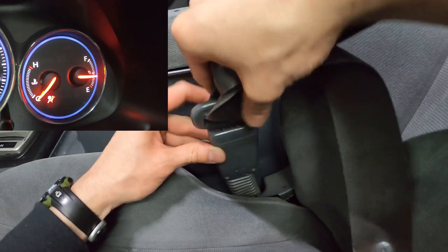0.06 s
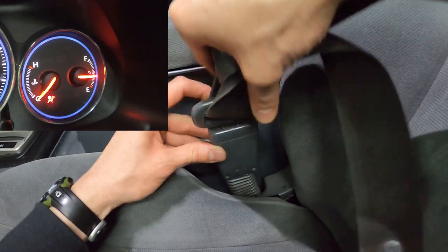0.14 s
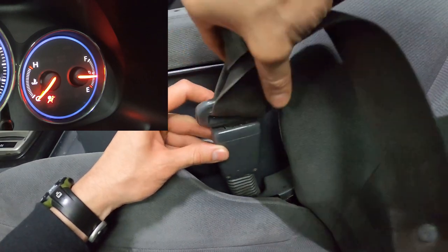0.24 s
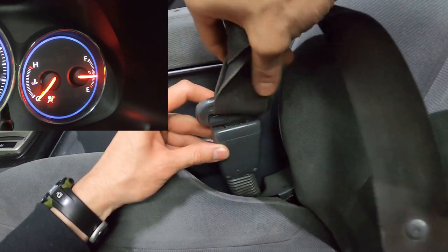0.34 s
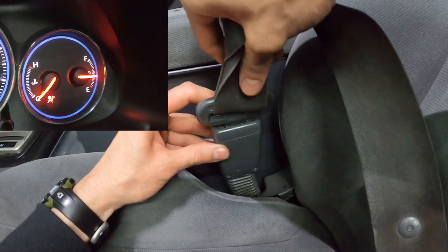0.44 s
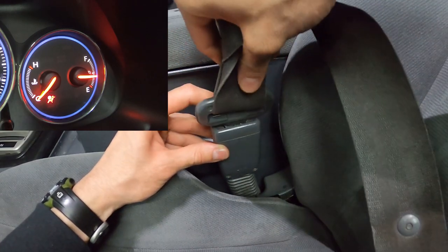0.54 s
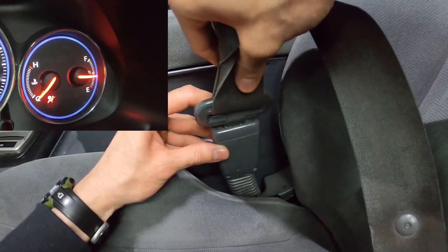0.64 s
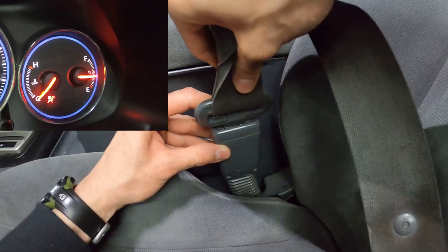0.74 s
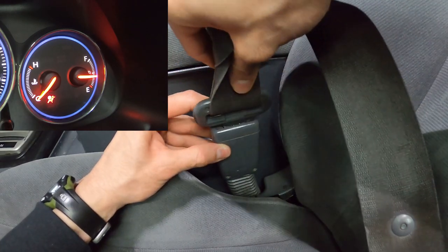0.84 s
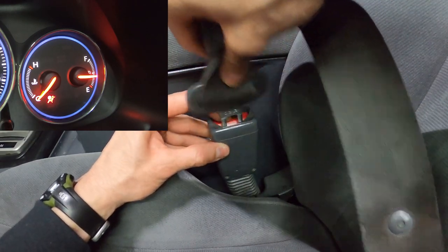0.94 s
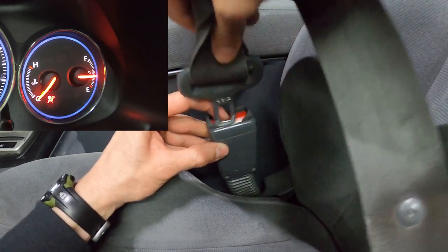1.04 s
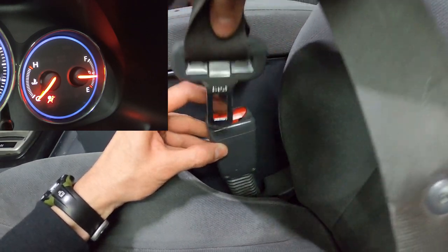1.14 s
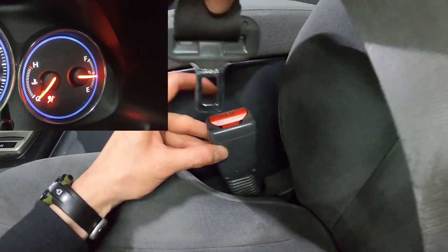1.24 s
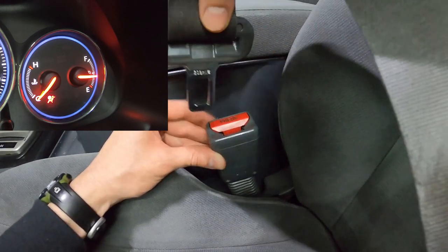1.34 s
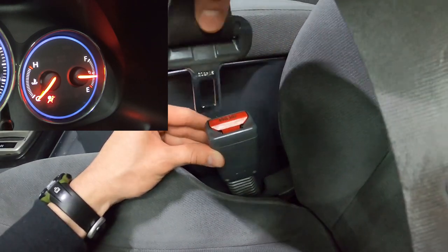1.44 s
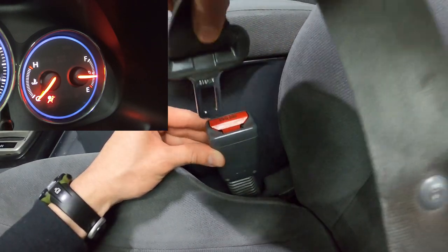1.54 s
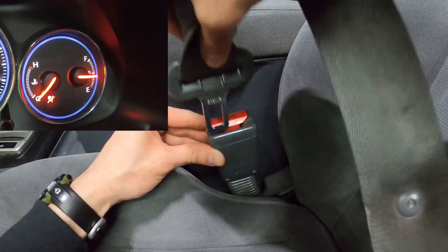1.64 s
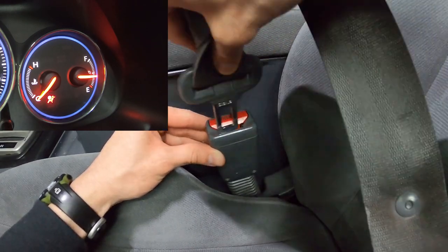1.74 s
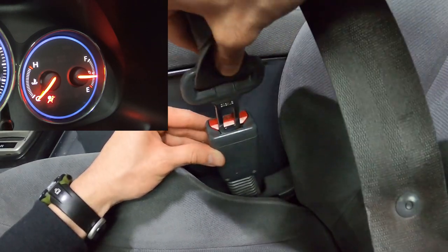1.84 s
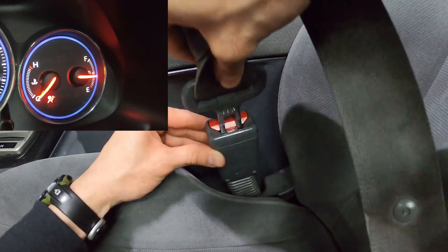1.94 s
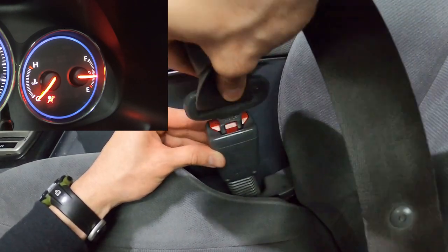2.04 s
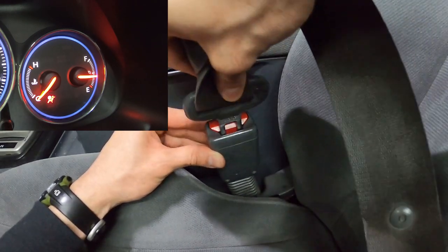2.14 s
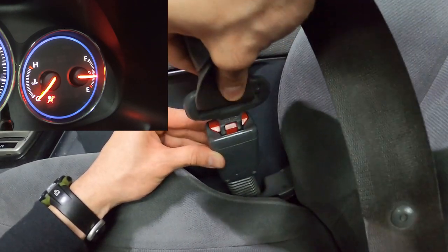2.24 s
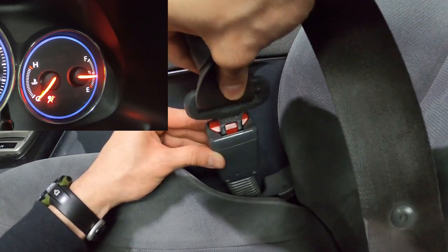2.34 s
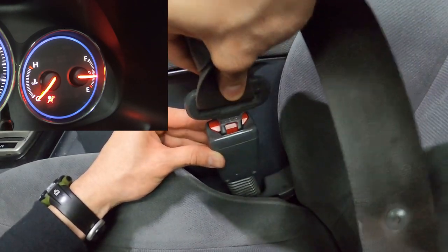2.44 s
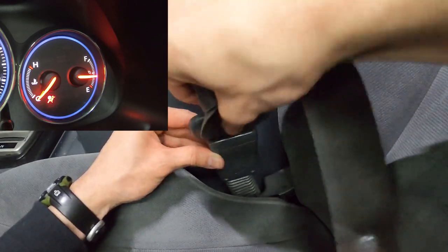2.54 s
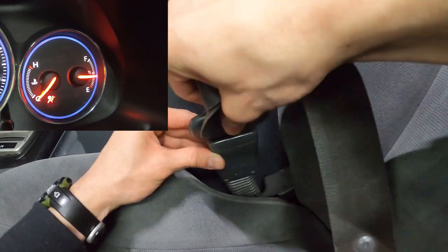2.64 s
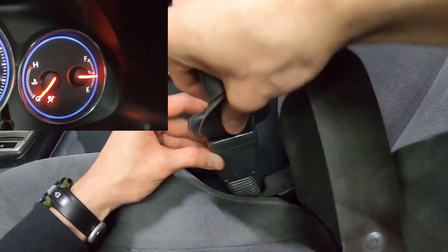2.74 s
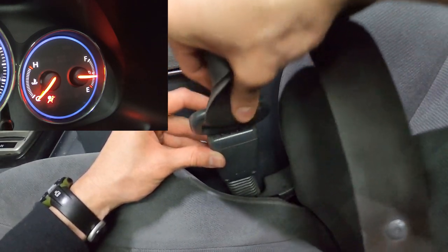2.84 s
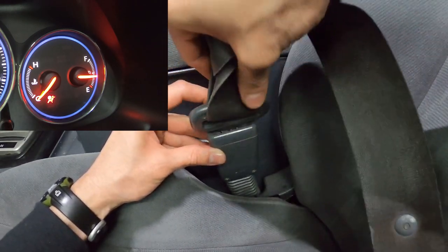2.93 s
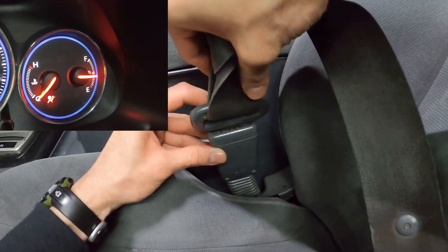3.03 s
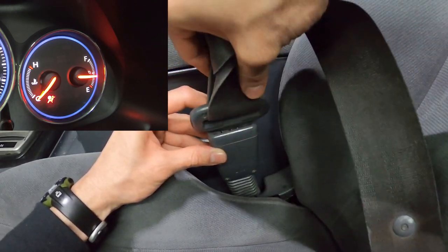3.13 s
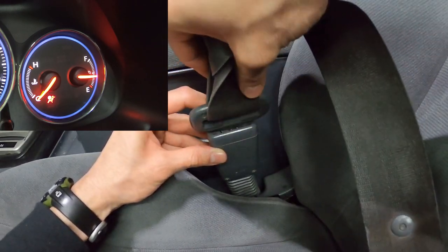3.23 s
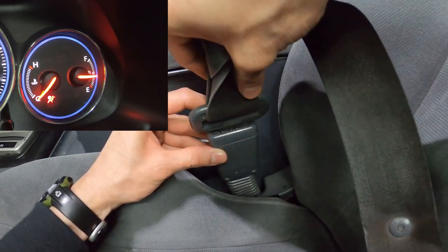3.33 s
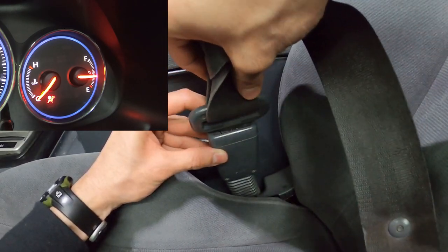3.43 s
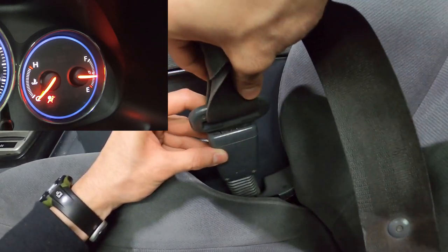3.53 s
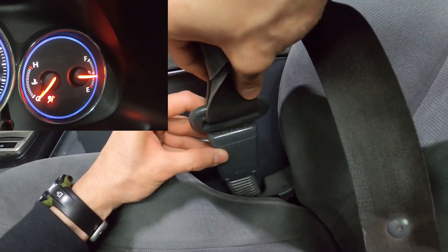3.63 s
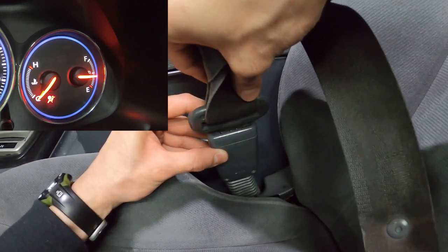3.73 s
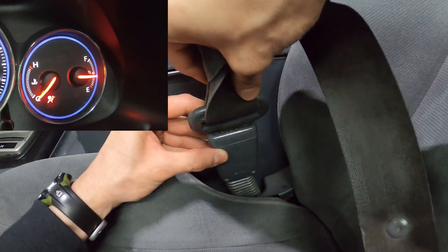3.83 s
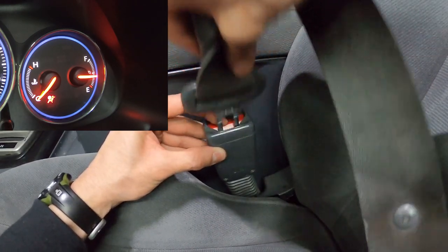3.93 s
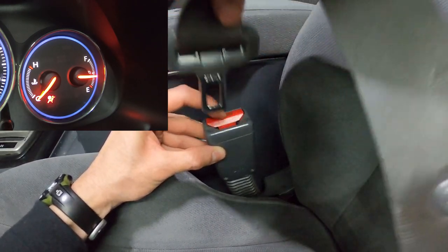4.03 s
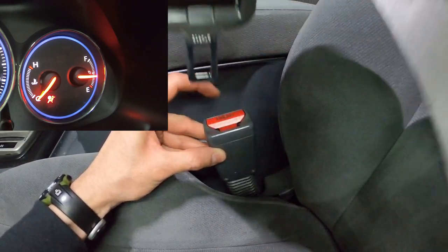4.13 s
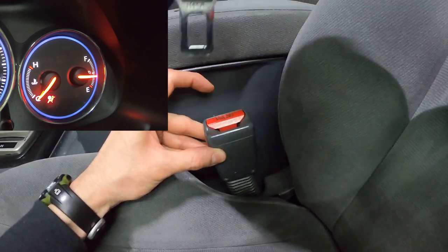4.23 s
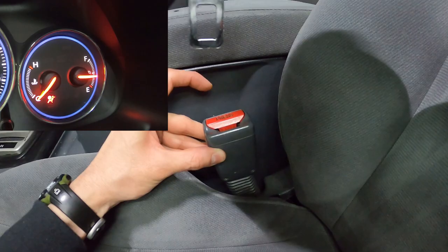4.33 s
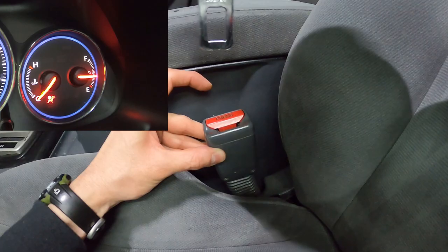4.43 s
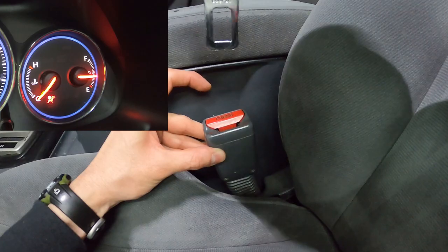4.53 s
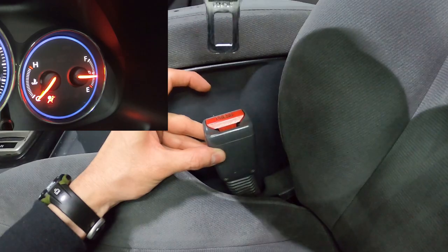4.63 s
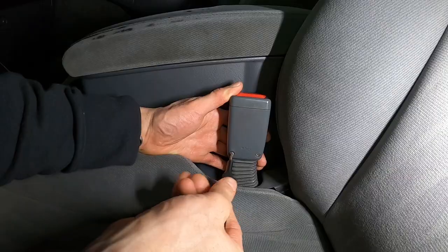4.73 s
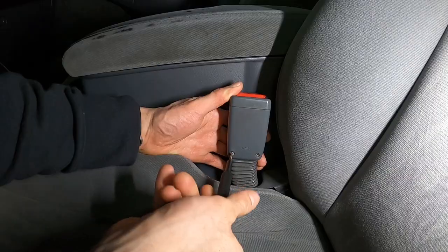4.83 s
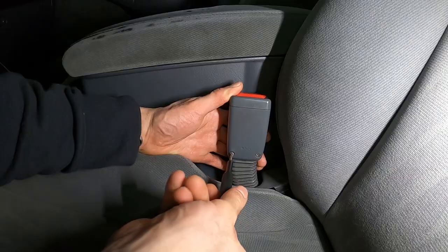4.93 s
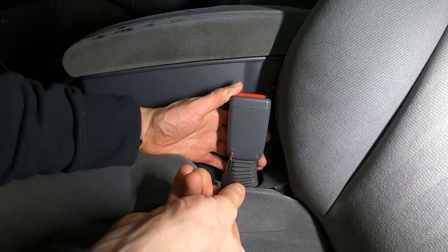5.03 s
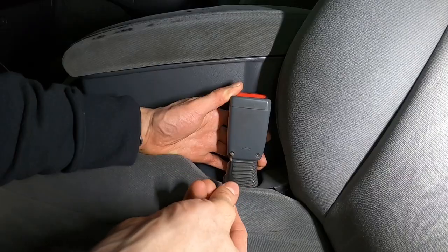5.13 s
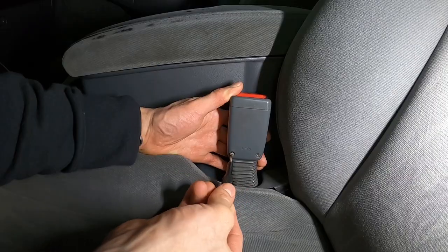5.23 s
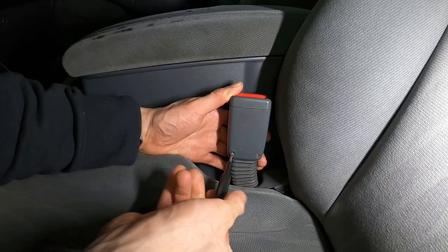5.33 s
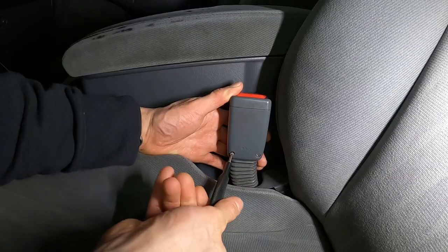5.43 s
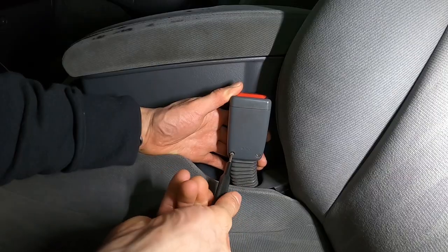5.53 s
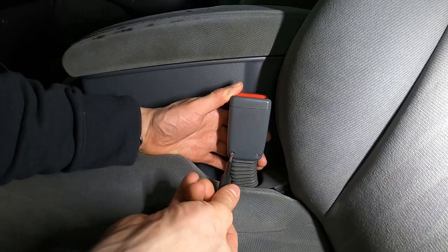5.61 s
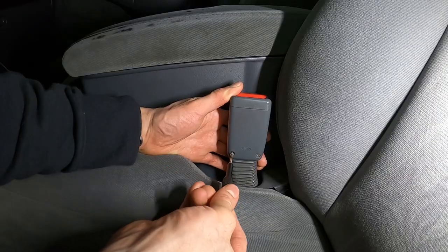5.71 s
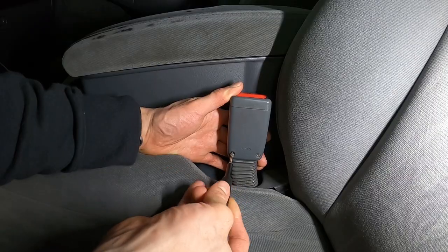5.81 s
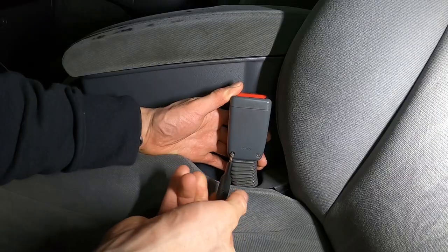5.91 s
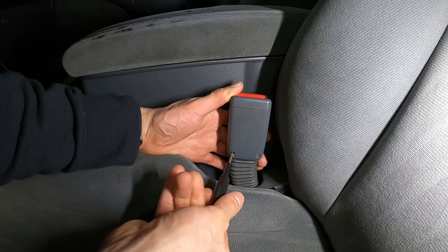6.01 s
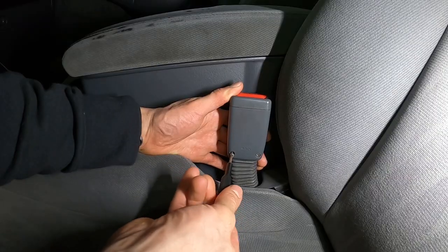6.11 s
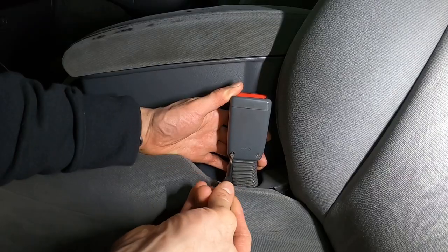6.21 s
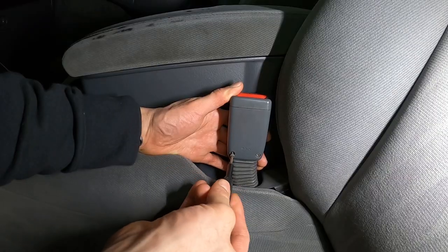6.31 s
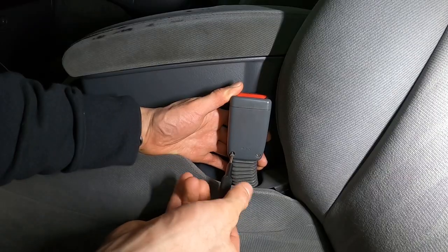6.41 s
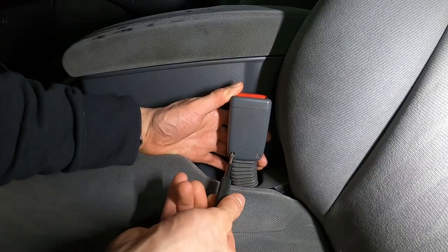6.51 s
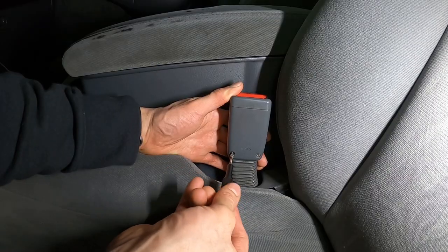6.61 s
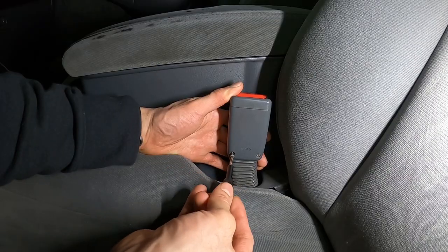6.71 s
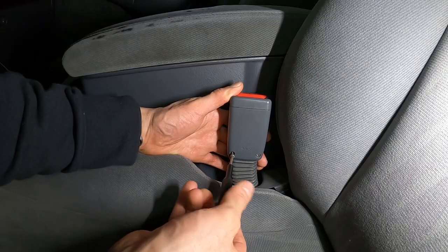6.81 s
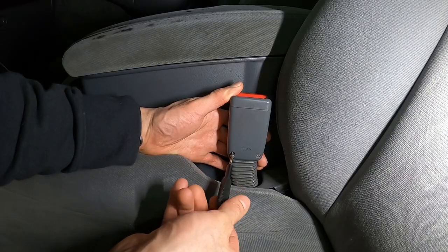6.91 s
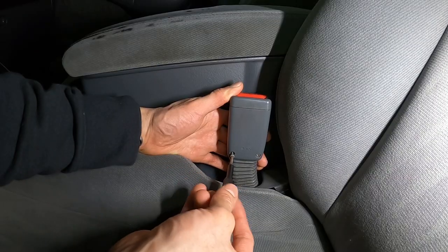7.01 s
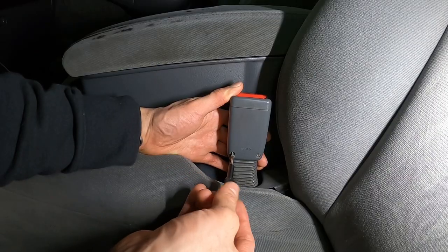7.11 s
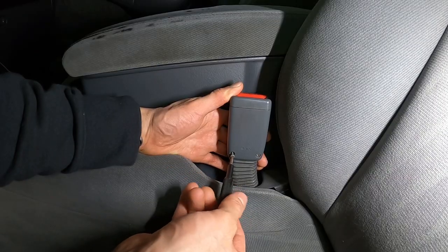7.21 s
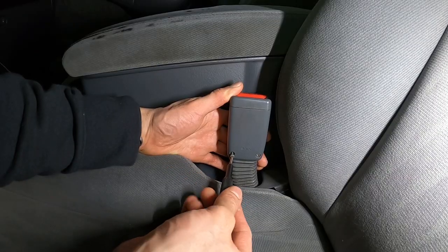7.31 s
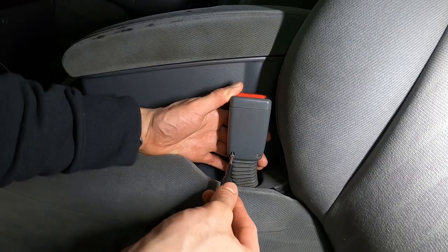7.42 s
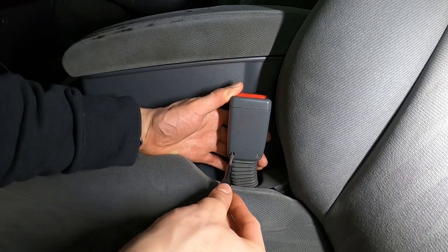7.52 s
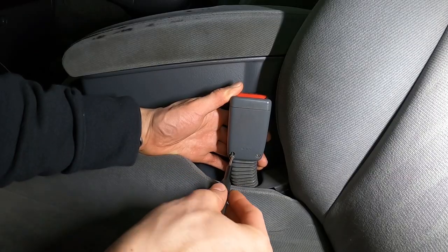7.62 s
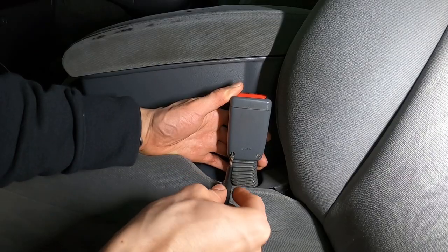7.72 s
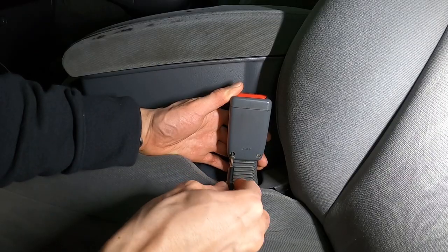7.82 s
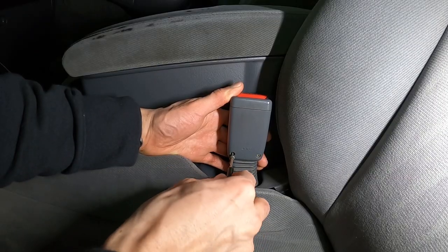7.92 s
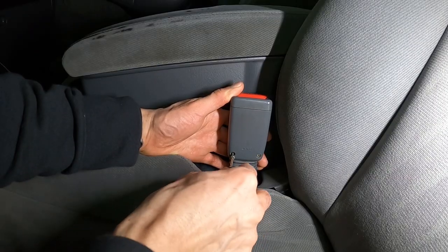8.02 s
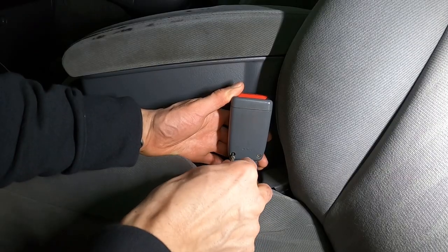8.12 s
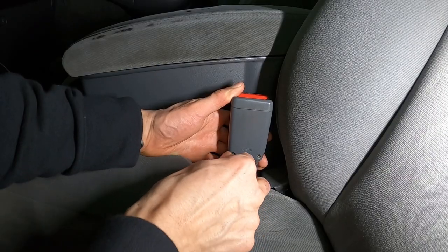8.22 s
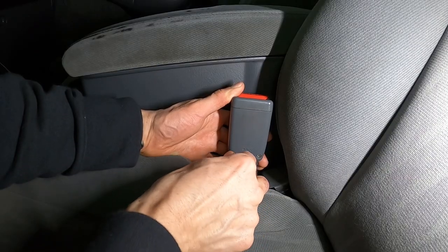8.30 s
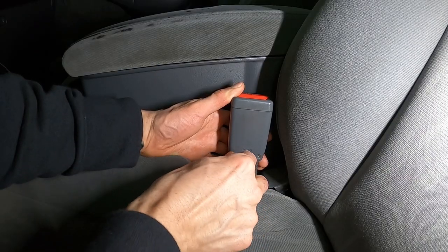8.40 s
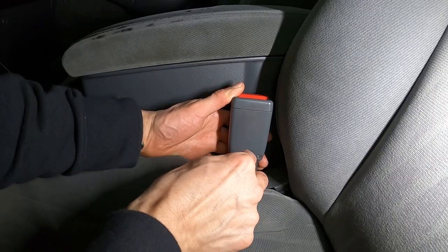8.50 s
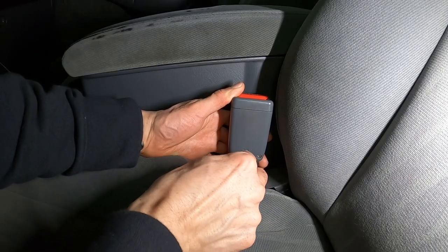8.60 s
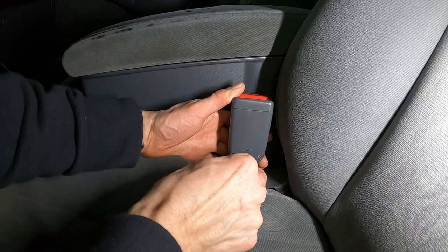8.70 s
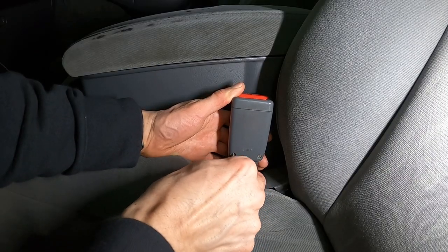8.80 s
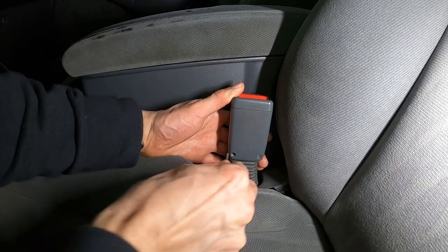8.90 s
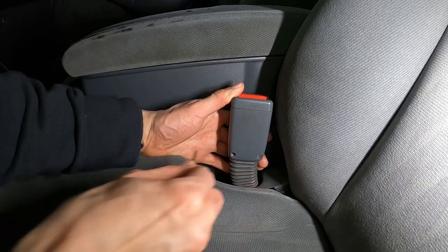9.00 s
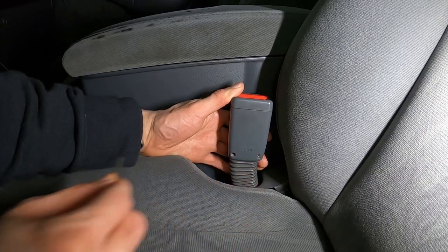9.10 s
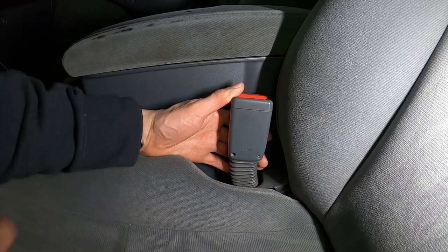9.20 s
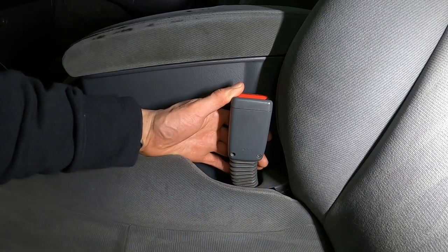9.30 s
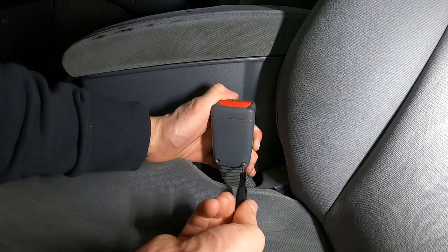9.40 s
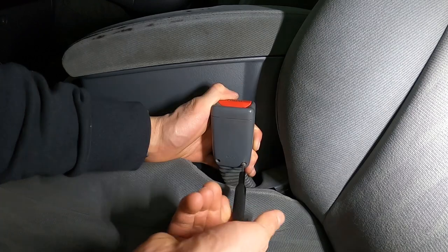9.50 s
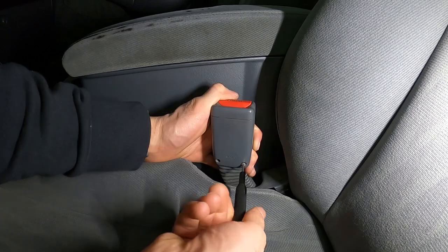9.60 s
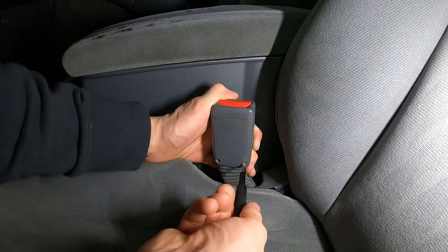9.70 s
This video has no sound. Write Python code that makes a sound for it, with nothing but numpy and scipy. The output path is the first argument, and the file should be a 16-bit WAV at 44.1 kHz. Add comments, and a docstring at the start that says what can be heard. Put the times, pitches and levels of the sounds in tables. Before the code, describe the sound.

Close, sharp seat belt buckle clicks with webbing rustle and low seat thumps, then sparse faint picking ticks, one loud plastic snap, and near silence.

```python
"""Seat belt buckle in a parked car

A latch plate is pushed into its buckle and let go, then a thin tool picks at the buckle.
Short noise rattles click in the plastic shell; the steel plate and a spring ring on as decaying modes.
Webbing and hands rub as dense random slips, and soft pushes make the low modes of the seat thump.
Two close microphone ports hear it with a short cabin tail, over shaped noise for the quiet cabin.
"""
import sys
import numpy as np
from scipy import signal
from scipy.fft import rfft, irfft
from scipy.io import wavfile
from scipy.ndimage import uniform_filter1d

SR = 44100
rng = np.random.default_rng(int(sys.argv[2]) if len(sys.argv) > 2 else 0)


def master(y):
    """Save y as 16-bit WAV."""
    cut = np.clip(np.atleast_2d(y).T, -1, 1)
    pcm = np.round(cut * 32767)  # scale
    wavfile.write(sys.argv[1], SR, pcm.astype(np.int16))


N = 429975

# resonances of the plastic buckle shell: mode_hz, width_hz, relative_level_db
SHELL_MODES = [(1000, 400, -7), (1380, 350, -15.5), (1540, 250, -0.5), (1894, 560, -3), (2140, 550, -2.5),
               (2980, 1300, 10.5), (3500, 76, -8), (4250, 700, 6), (4500, 150, -2), (5440, 1200, -6),
               (5900, 580, -4)]


def undb(db):
    """Gain of a dB value."""
    return 10 ** (np.asarray(db) / 20)


def level(x, db):
    """Set the rms level."""
    return x * undb(db) / np.sqrt(np.mean(x ** 2))


def peak(x, db):
    """Set the peak level."""
    return x * undb(db) / abs(x).max()


def curve(table):
    """Columns of a (time_s, value, ..) table, drawn as straight lines with one value a sample."""
    s, *columns = np.transpose(table)
    return [np.interp(np.arange(N) / SR, s, column) for column in columns]


def along(table):
    """A (pitch_hz, value) table on the bins of a full-length spectrum, joined along log pitch."""
    hz, value = np.transpose(table)
    bins_hz = np.arange(N // 2 + 1) * SR / N
    return np.interp(np.log(bins_hz + 1), np.log(hz + 1), value)


def colour(x, table):
    """Shape a full-length sound by a (pitch_hz, level_db) spectrum."""
    return irfft(rfft(x) * undb(along(table)), N)


def mode(x, hz, t60):
    """A decaying sine resonance whose envelope starts at 1 for a unit blow; t60 in seconds."""
    pole = np.exp(2j * np.pi * hz / SR - np.log(1000) / (max(t60, 1e-3) * SR))
    return signal.lfilter([1], [1, -pole], x).imag


def band(x, lo_hz, hi_hz):
    """Gentle band-pass."""
    return signal.sosfilt(signal.butter(2, [lo_hz, hi_hz], "band", fs=SR, output="sos"), x)


def walk(rate):
    """Random levels held 1 / rate seconds and smoothed twice; spread 1."""
    hold = int(SR / rate)
    steps = np.repeat(rng.standard_normal(N // hold + 1), hold)
    smooth = uniform_filter1d(uniform_filter1d(steps, hold), hold)[:N]
    return smooth / smooth.std()


def add(out, x, s):
    """Mix x into out from time s."""
    i = int(s * SR)
    out[i:i + len(x)] += x[:N - i]


def port_pair(shape, own_db):
    """Noise common to both ports plus a part of its own at each, own_db relative to the common one."""
    common = shape(rng.standard_normal(N))
    own = np.array([shape(rng.standard_normal(N)) for _ in range(2)])
    return common + undb(own_db) * own


def cabin():
    """Low rumble and boom follow the sway of seat and bodywork under the hands, over a faint steady hiss."""
    # seat and bodywork moving: time_s, rumble_level_db, boom_level_db
    sway = [(0.0, -49.5, -59.5), (0.57, -70.5, -80.5), (0.97, -53, -62.5), (1.63, -59.5, -74),
            (2.01, -57, -68), (2.58, -58, -73), (2.82, -53.5, -64), (3.26, -63.5, -79),
            (4.04, -53.5, -68.5), (4.24, -58.5, -62.5), (4.56, -69, -75), (5.19, -61.5, -64),
            (5.54, -74, -67), (6.16, -63, -64.5), (6.54, -76.5, -68.5), (7.82, -70.5, -69),
            (8.74, -73, -64), (8.96, -61, -67.5), (9.42, -73, -71.5), (9.75, -76, -68)]
    # boom spectrum: pitch_hz, density_db (per Hz, relative)
    boom_colour = [(41, -43.5), (70, -16), (107, -14.5), (126, -2), (150, 0.5), (214, -3), (265, -11.5),
                   (337, -14), (500, -24), (650, -54.5), (1100, -120)]
    # hiss spectrum: pitch_hz, density_db (per Hz, relative)
    hiss_colour = [(210, -30), (350, -4), (404, -9), (581, -5.5), (906, -4.5), (1260, -2.5), (2310, -19),
                   (4030, -26), (4870, -23), (10100, -38.5), (15500, -35.5)]
    rumble_db, boom_db = curve(sway)

    surge_db = 2.5 * walk(12)
    rumble = level(port_pair(lambda x: band(band(x, 17, 65), 5.3, 59), -13.0), 0)
    rumble = undb(rumble_db + surge_db) * rumble

    flicker_db = 2.6 * walk(19)
    boom = level(port_pair(lambda x: colour(x, boom_colour), -9), 0)
    boom = undb(boom_db + flicker_db) * boom

    hiss_drift_db = 1.0 * walk(12)
    hiss = level(port_pair(lambda x: colour(x, hiss_colour), 2.0), -80)
    return rumble + boom + undb(hiss_drift_db) * hiss


def thumps(push_s=0.0098, apart=.35):
    """A soft, uneven push rings the low modes of seat and stalk; the ports feel it a little differently."""
    # pushes that reach the seat frame: start_s, seat_peak_db, t60_s, stalk_relative_db
    pushes = [(0.047, -39.5, 0.23, -16.5), (0.875, -47, 0.13, 1.5), (1.021, -32, 0.49, -10.5),
              (1.778, -36.5, 0.27, -4), (2.128, -47.5, 0.37, -6), (2.601, -38, 0.21, -13.5),
              (2.628, -33.5, 0.47, -18), (2.67, -43, 0.35, -6.5), (3.757, -42, 0.18, -10),
              (3.987, -30.5, 0.5, -6.5), (7.15, -38, 0.14, 1), (7.94, -59.5, 0.2, 7),
              (8.201, -60, 0.22, 8.5), (8.71, -54, 0.3, -8), (8.757, -46.5, 0.45, -14),
              (8.81, -47, 0.3, -11), (8.867, -44, 0.48, -16.5), (8.919, -50.5, 0.18, -5),
              (9.563, -52, 0.41, -0.5)]
    # seat modes: mode_hz, level_db, decay_share (of the push's t60)
    seat_modes = [(45.7, -2, 0.96), (58.2, -8, 0.077), (88.8, -10, 0.27)]
    # modes of the buckle's stalk: mode_hz, level_db, t60_s
    stalk_modes = [(120, -5, .09), (175, 0, .08), (250, -1, .07), (340, -3, .05), (480, -12, .04)]
    out = np.zeros((2, N))
    t = np.arange(SR // 2) / SR
    chance = rng.standard_normal((len(pushes), 2, len(t)))
    for (s, db, t60, stalk_db), noise in zip(pushes, chance):
        swell = t / push_s * np.exp(-t / push_s)  # fullest after push_s
        push = swell * (noise[0] + apart * noise[1] * np.array([[1], [-1]]))
        seat_push = push.mean(0) + 0.37 * push  # mostly common to both ports
        seat = sum(undb(m_db) * mode(seat_push, f, t60 * share) for f, m_db, share in seat_modes)
        stalk = sum(undb(m_db) * mode(push, f, ring) for f, m_db, ring in stalk_modes)
        both = peak(seat, db) + peak(stalk, db + stalk_db)
        add(out.T, both.T, s)
    return out


def shell(x, hz, spread, chance):
    """Shell modes nearest the pitch ring loudest, those near an octave up answer; spread in octaves."""
    out = 0
    for (f, width, m_db), c in zip(SHELL_MODES, chance):
        octaves = np.log2(f / hz)
        near = np.exp(-(octaves / spread) ** 2)
        answer = .2 * np.exp(-((octaves - .8) / spread) ** 2)
        ring = mode(x, f, 2.2 / width) * np.sqrt(width)  # a wide resonance dies sooner
        out = out + (near + answer) * undb(m_db + 2 * c) * ring
    floor_hz = min(hz, 2500)
    return level(band(band(out, .6 * floor_hz, 6500), .55 * floor_hz, 7000), 0)


def bright(x, apart=0.58):
    """Treble of a contact: rows of x are a shared noise and one that differs between the ports."""
    both = x[0] + apart * x[1] * np.array([[1], [-1]])
    return band(band(both, 5500, 10300), 4500, 12000)


def slips(grains_per_s=7000, scatter_db=2.0):
    """Friction as dense tiny slips of uneven size at random moments, coming in patches."""
    happens = rng.random((2, N)) < grains_per_s / SR
    size = rng.standard_normal((2, N))
    extra_db = scatter_db * np.minimum(rng.exponential(size=N), 3)
    patches_db = 1.4 * walk(77)
    return happens * size * undb(extra_db) * undb(patches_db)


def rubbing():
    """Webbing and skin slide slowly; each quick slide swells, rings the shell and dies."""
    # slow sliding: time_s, level_db
    slow_slide = [(0.0, -69), (0.16, -62), (0.46, -90), (0.51, -85.5), (0.97, -88), (1.08, -66),
                  (1.25, -73), (1.57, -78.5), (1.87, -80.5), (2.55, -92), (2.71, -71), (2.95, -70.5),
                  (3.09, -104), (4.0, -94), (4.13, -68), (4.37, -84.5), (4.45, -108), (4.75, -93),
                  (4.86, -84.5), (7.6, -87), (8.2, -80.5), (8.5, -87.5), (9.35, -81.5), (9.75, -87)]
    # spectrum of the weave: pitch_hz, density_db (per Hz, relative)
    weave_colour = [(400, -23.5), (1000, -9), (1500, -4), (2800, -3), (4600, -8), (6500, -15), (9000, -28),
                    (15400, -60.5)]
    # quick slides: start_s, length_s, level_db, treble_relative_db, pitch_hz
    scrapes = [(0.035, 0.085, -69, -25, 1760), (0.297, 0.11, -75.5, -13, 2420),
               (0.383, 0.12, -65.5, -16, 2320), (0.692, 0.12, -74.5, -7, 2900),
               (0.849, 0.041, -47.5, -17, 1560), (1.005, 0.072, -44, -4.5, 2110),
               (1.07, 0.022, -63, -13, 3300), (1.17, 0.052, -59, -6, 1760), (1.304, 0.02, -62.5, -12, 2900),
               (1.333, 0.088, -53.5, -13, 2900), (1.408, 0.04, -61.5, -11, 2900),
               (1.498, 0.25, -70.5, -18, 2900), (1.788, 0.067, -63, -32, 1080),
               (2.026, 0.18, -68.5, -14, 1200), (2.302, 0.074, -87.5, 7, 1650),
               (2.524, 0.098, -62, -8, 2900), (2.58, 0.051, -50, -11, 3000), (2.61, 0.019, -62, 0, 3420),
               (2.836, 0.041, -50, -9, 2900), (2.855, 0.025, -53, -24, 2160),
               (2.921, 0.19, -64.5, -15, 2600), (3.698, 0.042, -58.5, -30, 1650),
               (3.729, 0.053, -54, -18.5, 1510), (3.942, 0.083, -64, -12, 3550),
               (3.984, 0.087, -54.5, -8, 2900), (4.09, 0.097, -63, -13, 1100),
               (4.307, 0.094, -84.5, 4.5, 1984), (4.807, 0.1, -74.5, -17.5, 1910),
               (5.204, 0.072, -79, -10, 1660), (5.399, 0.051, -73.5, -30.5, 1850),
               (5.547, 0.083, -73, -25.5, 2600), (5.838, 0.072, -76, -8, 2200),
               (5.934, 0.081, -66.5, -26.5, 2210), (6.26, 0.12, -76, -18, 2190),
               (6.413, 0.026, -76.5, -23, 2100), (6.73, 0.078, -78, -20.5, 2590),
               (6.885, 0.024, -75.5, -28, 1950), (7.032, 0.15, -73, -27.5, 1900),
               (7.153, 0.1, -68.5, -28.5, 2900), (7.33, 0.06, -73, -25, 1850),
               (8.713, 0.07, -74.5, -33, 3300), (8.776, 0.14, -70, -32.5, 1850),
               (8.884, 0.066, -56, -22, 2900), (9.538, 0.037, -53.5, -16, 1590)]
    grains = slips()
    weave = level(colour(grains[0], weave_colour), 0)
    hiss = level(bright(grains), 0)
    out = undb(curve(slow_slide)[0]) * (weave + undb(-15) * hiss)

    chance = rng.standard_normal((len(scrapes), len(SHELL_MODES)))
    for (s, length, db, treble_db, hz), w in zip(scrapes, chance):
        part = slice(int(s * SR), int((s + length) * SR))
        swell = np.hanning(part.stop - part.start) ** 1.6
        body = .8 * weave[part] + .6 * shell(grains[0, part], hz, .3, w)
        out[:, part] += swell * undb(db) * (body + undb(treble_db) * hiss[:, part])
    return out


def ejector_spring():
    """Blows set the spring humming in long modes, each paired with one 22 Hz higher so that it beats."""
    # blows on the spring: start_s, low_mode_db, middle_mode_db, high_mode_db
    spring_blows = [(0.778, -77, -80, -95), (1.251, -72.5, -59, -74), (1.974, -74.5, -84, -94),
                    (2.197, -76, -90, -81), (2.64, -80, -64.5, -80), (3.983, -82, -68, -86)]
    # spring modes: mode_hz, t60_s
    spring_modes = [(940, 1.6), (1949, .8), (3800, .35)]
    out, blow = np.zeros(N), signal.unit_impulse(SR)
    for s, *dbs in spring_blows:
        for db, (f, t60) in zip(dbs, spring_modes):
            beating = mode(blow, f, t60) + 0.74 * mode(blow, f + 22, t60)
            add(out, undb(db) * beating, s)
    return out


def steel_plate():
    """Blows leave the loose plate ringing in short modes whose strengths vary from blow to blow."""
    # blows on the plate: start_s, level_db
    plate_blows = [(.866, -43), (1.047, -38.5), (1.09, -54.5), (1.133, -55.5), (1.175, -44), (1.805, -55.5),
                   (4.013, -36.5)]
    # plate modes: mode_hz, relative_level_db (before the chance of each blow), t60_s
    plate_modes = [(1820, -1, .06), (3300, -12, .06), (4200, -4, .04), (5080, -16, .04), (6290, -1, .045)]
    out, blow = np.zeros(N), signal.unit_impulse(SR)
    chance = rng.standard_normal((len(plate_blows), len(plate_modes)))
    for (s, db), w in zip(plate_blows, chance):
        for (f, m_db, t60), c in zip(plate_modes, w):
            add(out, undb(db + m_db + 1.9 * c) * mode(blow, f, t60), s)
    return out


def contacts():
    """All contacts: the listed ones and faint strays of fingers and tool at random moments."""
    # contacts: start_s, body_peak_db, strongest_pitch_hz, treble_relative_db
    listed = [(0.028, -28, 3780, -3), (0.038, -27, 2500, -20), (0.0429, -53, 1030, -17),
              (0.085, -43, 1470, -12.5), (0.139, -47, 2720, -15), (0.165, -47, 1710, -8),
              (0.2026, -49.5, 1380, -4), (0.429, -54, 2360, -17), (0.478, -54.5, 2500, -15),
              (0.7824, -44, 1450, -61), (0.8127, -53, 1350, -27), (0.826, -43.5, 2370, -21),
              (0.8678, -30.5, 1400, -18), (0.8711, -27.5, 4230, -7), (0.876, -31.5, 1410, -16),
              (0.8949, -48, 1030, -32), (0.9865, -54.5, 990, -36), (1.0104, -48, 3640, -21),
              (1.0213, -20, 1760, -7), (1.0499, -26.5, 4250, -10), (1.0582, -29, 1420, -17),
              (1.121, -47.5, 1530, -29), (1.1468, -51, 1360, -7), (1.1666, -42.5, 1590, 2.5),
              (1.1778, -34.5, 6140, -13), (1.1974, -36, 1350, -22), (1.203, -33.5, 1700, -35),
              (1.226, -42.5, 1490, -29), (1.2529, -20.5, 4000, -17), (1.386, -40, 2900, -9.5),
              (1.5573, -52.5, 2970, -11), (1.6226, -52, 2930, -35), (1.7834, -30, 1350, -11),
              (1.7915, -45, 690, -30), (1.8051, -40.5, 890, -12), (1.8693, -41.5, 1200, -11),
              (1.974, -51.5, 890, -29), (2.0649, -46.5, 1300, -9), (2.1317, -37, 4450, -12.5),
              (2.189, -48, 4500, -8), (2.1966, -40.5, 5380, -8.5), (2.347, -66.5, 4980, -2.5),
              (2.493, -55, 4000, -12), (2.5259, -49.5, 1590, -38), (2.5807, -25, 2180, -8.5),
              (2.6141, -22, 3270, -4), (2.6206, -12.5, 3950, -8), (2.7411, -39, 2800, -21),
              (2.809, -59, 3500, -5), (2.8414, -37.5, 1550, -21), (2.8528, -28, 2460, -5.5),
              (2.8605, -25.5, 2250, -7), (2.956, -51.5, 2630, -7), (2.9836, -42.5, 3140, -36.5),
              (3.449, -45.5, 1360, -21), (3.49, -62.5, 1350, -34), (3.5504, -60, 1330, -23),
              (3.586, -65, 1300, -33), (3.655, -47.5, 1750, -30), (3.72, -41.5, 3810, -20),
              (3.753, -37.5, 1420, -13.5), (3.7613, -36, 940, -8.5), (3.802, -64, 3000, -18),
              (3.8813, -62.5, 1750, -25.5), (3.9828, -19, 4950, -4), (3.9891, -27, 2300, -6),
              (4.0055, -28.5, 4060, -30), (4.0127, -26.5, 4070, -5), (4.033, -36.5, 6140, -5),
              (4.0681, -40, 1550, -9), (4.0913, -30, 4230, -2), (4.115, -35, 1670, -25),
              (4.14, -37, 1680, -13), (4.1474, -38, 3580, -32), (4.1641, -43, 1040, -27),
              (4.8421, -45, 2734, -20), (4.8499, -45.5, 1860, -21.5), (4.9971, -49.5, 1875, -25.5),
              (5.0137, -47.5, 1810, -31.5), (5.0245, -49, 1910, -37), (5.3898, -39.5, 1610, -34.5),
              (5.428, -55.5, 1730, -32.5), (5.5356, -45.5, 1830, -34), (5.5578, -41, 1760, -29),
              (5.6061, -64.5, 2500, -30), (5.935, -49.5, 1570, -42), (5.9636, -44.5, 1850, -14),
              (5.985, -53, 2110, -25), (6.1283, -51.5, 1600, -15), (6.1454, -53, 1918, -35),
              (6.6233, -41.5, 1610, -23), (6.6467, -48, 1980, -27), (6.6916, -57.5, 1850, -23.5),
              (7.065, -56.5, 1950, -35), (7.1021, -53, 2020, -23.5), (7.1401, -43, 1530, -36),
              (7.1506, -16.5, 2015, -20.5), (7.339, -47, 1720, -19), (7.37, -56.5, 1990, -34),
              (7.5213, -54.5, 2156, -25.5), (7.9545, -60, 2583, -32.5), (8.2402, -57.5, 1940, -37.5),
              (8.6973, -47, 1939, -33.5), (8.74, -57.5, 1900, -35), (8.778, -60, 1900, -38),
              (8.7975, -52, 1790, -27), (8.8171, -46.5, 3530, -32), (8.865, -57, 1900, -37),
              (8.8965, -40, 3100, -31), (8.9087, -42, 1790, -16), (8.9137, -37.5, 2040, -8),
              (8.9245, -50, 1630, -34), (8.953, -44.5, 2040, -38), (9.5544, -34, 1885, -15),
              (9.6184, -52.5, 2650, -31), (9.7285, -44, 1906, -40)]
    when, size = rng.random((10, 2)).T
    # strays: -69 to -64 dB, 1700 Hz, treble 36 dB down
    strays = [(s * (N - 1) / SR, -69 + 5 * c, 1700, -36) for s, c in zip(when, size)]
    return listed + strays


def dull_knock(x):
    """Four short low modes give the dull part of a contact."""
    modes = [(800, 1.5, .025), (620, 1.5, .03), (400, 1, .035), (270, .7, .04)]  # Hz, gain, t60 s
    rings = sum(gain * mode(x, f, t60) for f, gain, t60 in modes)
    return band(band(rings, 200, 1000), 150, 1100)


def clicks(spread=0.14, crack_db=5.5):
    """Each contact is a short rattle that rings the shell, with a crack, treble and a dull knock."""
    out, t, hits = np.zeros((2, N)), np.arange(SR // 12) / SR, contacts()
    noises = rng.standard_normal((len(hits), 2, len(t)))
    chance = rng.standard_normal((len(hits), len(SHELL_MODES) + 1))
    for (s, db, hz, treble_db), noise, w in zip(hits, noises, chance):
        t60 = max(.012 * np.exp(.25 * w[-1]), .002)  # around 12 ms, scattered
        attack = np.minimum(t / (0.058 * t60), 1)
        rattle = noise * np.exp(-np.log(1000) * t / t60) * attack

        # a brighter contact cracks more broadly
        crack = band(band(rattle[0], 1300, 5500), 1000, 6500)
        crack = level(crack, crack_db + .6 * treble_db)
        body = shell(rattle[0], hz, spread, w) + crack

        # soft and low contacts are duller, bright ones reach the frame of the buckle
        knock_db = -16 - 0.1527 * (db + 40) - 5 * np.log2(hz / 1500) + 0.34 * treble_db
        knock = peak(dull_knock(rattle[0]), db + knock_db)
        treble = peak(bright(rattle), db + treble_db)
        add(out.T, (peak(body, db) + treble + knock).T, s)
    return out


def cabin_tail(dry, t60_s=0.084, wet_db=-14.5):
    """The cabin answers with a short decaying noise tail, different at each port."""
    t = np.arange(SR // 4) / SR
    tails = band(rng.standard_normal((2, len(t))), 210, 14000) * np.exp(-np.log(1000) * t / t60_s)
    tails = level(tails, wet_db) / np.sqrt(len(t))
    return signal.fftconvolve(dry, tails, axes=1)[:, :N]


def scene():
    """Buckle sounds with the cabin's tail, over thumps and the cabin floor."""
    buckle = clicks() + steel_plate() + ejector_spring() + rubbing()
    return buckle + cabin_tail(buckle) + thumps() + cabin()


def record(dry):
    """The two ports differ in phase and level with pitch; the top is cut at 15.4 kHz."""
    # port level difference: pitch_hz, left_minus_right_db
    balance = [(40, 1.6), (90, 0), (300, .7), (700, -.7), (1400, .1), (2800, 1.1), (5600, -.8), (9000, -4),
               (13000, -6.5)]
    # port phase difference: pitch_hz, left_lead_radians
    phase = [(0, 0), (60, 0), (200, -.4), (700, -.45), (1640, -.6), (4400, -1.1), (7000, -1.4),
             (10000, -1.6), (15500, -1.8)]
    # each port takes half of the difference
    tilt = undb(along(balance) / 2) * np.exp(.5j * along(phase))
    ports = irfft(rfft(dry) * np.array([tilt, 1 / tilt]), N)
    return signal.sosfilt(signal.ellip(8, .2, 70, 15400, fs=SR, output="sos"), ports)


dry = scene()
out = record(dry)
master(out)
```